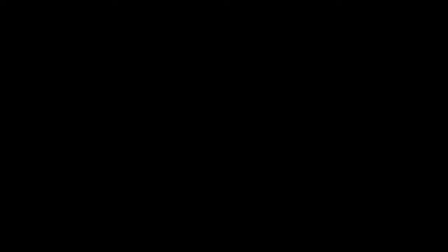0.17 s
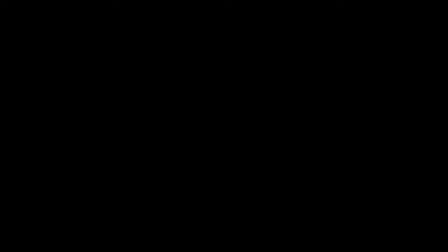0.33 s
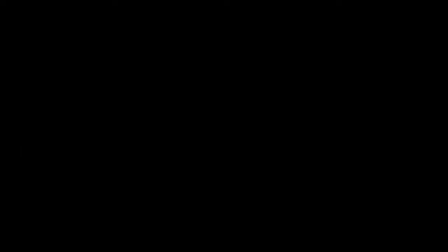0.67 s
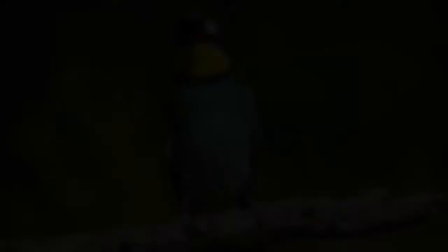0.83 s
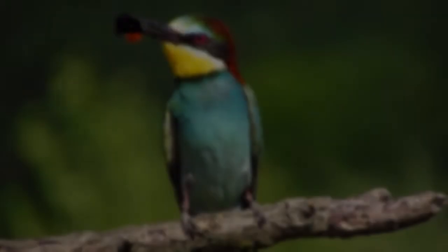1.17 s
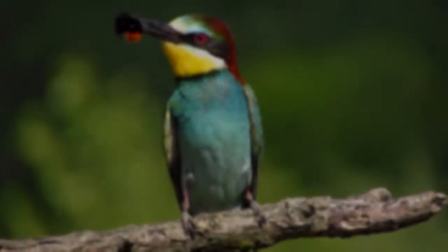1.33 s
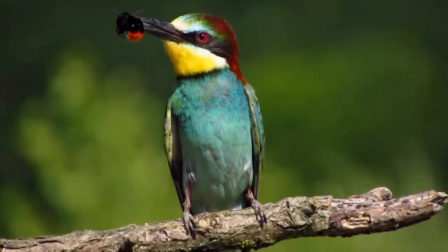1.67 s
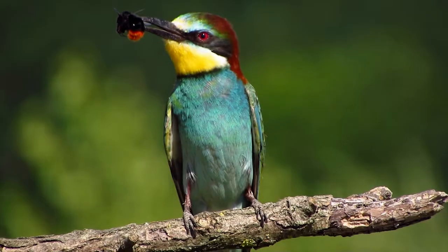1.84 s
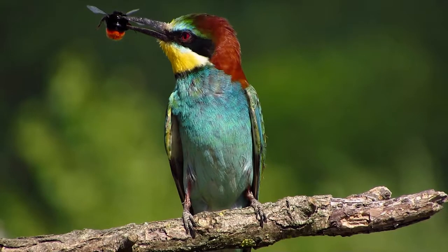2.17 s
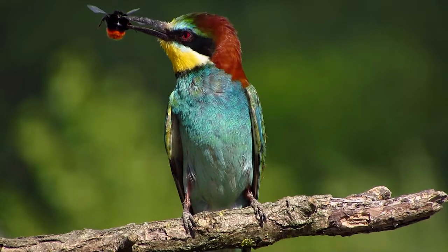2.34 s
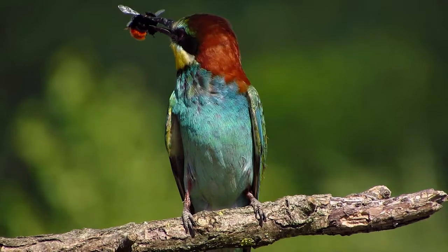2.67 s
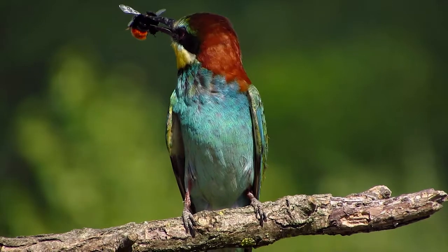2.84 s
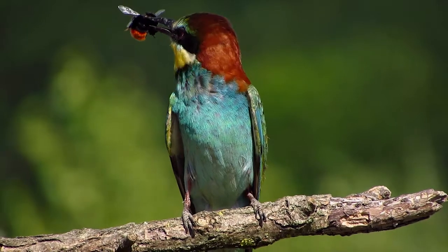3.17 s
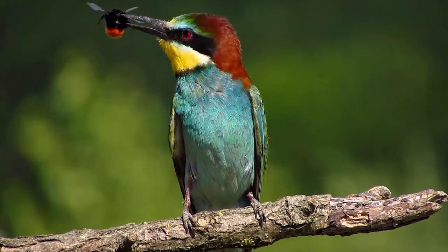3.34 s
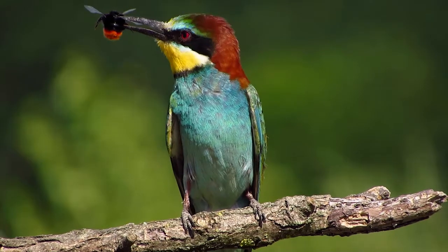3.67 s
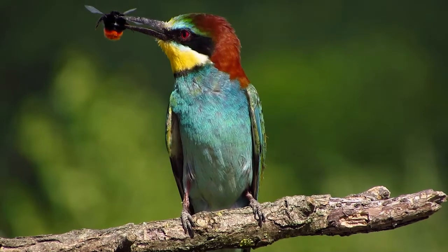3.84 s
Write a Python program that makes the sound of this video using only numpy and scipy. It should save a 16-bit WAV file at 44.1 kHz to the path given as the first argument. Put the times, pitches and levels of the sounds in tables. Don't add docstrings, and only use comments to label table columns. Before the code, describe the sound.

A small bird gives brief rolled whistles in open country, answered faintly by a farther bird

```python
import sys
import numpy as np
from scipy import signal
from scipy.io import wavfile
from scipy.ndimage import uniform_filter1d

SR = 44100
rng = np.random.default_rng(int(sys.argv[2]) if len(sys.argv) > 2 else 0)


def natural_amplitude(level_db):
    exponent = np.asarray(level_db, float) / 20
    return 10 ** exponent


def master(y):
    cut = np.clip(np.atleast_2d(y).T, -1, 1)
    pcm = np.round(cut * 32767)
    wavfile.write(sys.argv[1], SR, pcm.astype(np.int16))


N = 176400


def evened(x):
    return x / np.sqrt(np.mean(abs(x) ** 2) + 1e-20)


def read(points, hz):
    f, value = np.transpose(points)
    return np.interp(np.log(hz + 1), np.log(f + 1), value)


def add(mix, s, sound, pan_db):
    part = mix[:, round(s * SR):][:, :len(sound)]
    sides = natural_amplitude(np.array([[pan_db / 2], [-pan_db / 2]]))
    part += sides * sound[:part.shape[1]]


def fade_db(s):
    start_s, length_s = .11, 2.0
    return 20 * np.log10(np.clip((s - start_s) / length_s, 1e-6, 1))


def noise(magnitude):
    patch_db, swell_db, flicker_db = 1.1, .25, .7
    size = 2 * (len(magnitude) - 1)
    frames = 4 * N // size + 5
    a, b, patches = rng.standard_normal((frames, len(magnitude), 3)).T
    patches = uniform_filter1d(patches, size=20, axis=0)
    patches = evened(uniform_filter1d(patches, size=8, axis=1))
    slow, quick = rng.standard_normal((2, frames))
    swell = evened(uniform_filter1d(slow, size=30))
    field_db = patch_db * patches + swell_db * swell + flicker_db * quick
    spectra = (a + 1j * b) * magnitude[:, None] * natural_amplitude(field_db)
    return signal.istft(spectra, nperseg=size, noverlap=3 * size // 4)[1][:N]


def air():
    # f/Hz, level/dB
    centre_curve = [(20, -10), (200, -19), (800, -11.5), (1500, -18.5), (3300, -21.5), (4300, -24.5),
                    (9000, -28), (14700, -39.5)]
    # f/Hz, level/dB
    side_curve = [(12, -32), (20, -19), (204, -1), (725, -3), (3220, -17), (4020, -19), (7380, -22),
                  (12500, -29.5), (14700, -33)]
    mid_db, side_db, pan_db = -52.5, -49, -0.06
    hz = np.fft.rfftfreq(2048, 1 / SR)
    mid = natural_amplitude(mid_db) * evened(noise(natural_amplitude(read(centre_curve, hz))))
    side = natural_amplitude(side_db) * evened(noise(natural_amplitude(read(side_curve, hz))))
    return natural_amplitude(np.array([[pan_db / 2], [-pan_db / 2]])) * np.array([mid + side, mid - side])


def drone():
    # f/Hz, width/Hz, level/dB
    resonances = [(281.7, 13.4, -9.5), (355.5, 2, -16), (475, 4, -27.5), (584.9, 22, 1), (738.5, 99, -3.5),
                  (808.5, 20.4, -4), (913, 118, -8.5), (989, 40, -8.5), (1150, 66, -14.5),
                  (1231.5, 42, -11.5), (1409, 20, -19.5)]
    level_db, same, lag_rad = -48.5, 0.94, 0.49
    hz = np.fft.rfftfreq(4096, 1 / SR)
    power = sum((natural_amplitude(db) / (1 + (2 * (hz - f) / width) ** 2)) ** 2 for f, width, db in resonances)
    lines = np.sqrt(power)
    left = noise(lines)
    delayed = (signal.hilbert(left) * np.exp(-1j * lag_rad)).real
    right = same * delayed + np.sqrt(1 - same ** 2) * noise(lines)
    return natural_amplitude(level_db) * evened(np.array([left, right]))


def chorus():
    centre_hz, width_hz, level_db = 9310, 220, -76.5
    hz = np.fft.rfftfreq(2048, 1 / SR)
    band = 1 / (1 + (2 * (hz - centre_hz) / width_hz) ** 2)
    return natural_amplitude(level_db) * evened(np.array([noise(band), noise(band)]))


def whistle(level_db, factor, last_db, lead_db):
    # t/s after the start, f/Hz
    arch = [(.006, 1330), (.016, 1560), (.022, 1830), (.028, 1950), (.036, 2115), (.042, 1960),
            (.048, 1800), (.058, 1520)]
    # centre t/s, half length/s, level/dB
    breaths = [(.011, .005, -23), (.018, .0055, -17), (.0278, .0048, -8), (.0362, .0062, 0),
               (.045, .0042, -5), (.05, .0045, -9), (.057, .006, -23)]
    octave_db, octave_fall_db_per_s, octave_floor_db = -7, -1800, -35
    flutter_db = .8
    t = np.arange(0, .07, 1 / SR)
    turn = 2 * np.pi * np.cumsum(factor * np.interp(t, *np.transpose(arch))) / SR
    puffs = 0
    for k, (centre, half, db) in enumerate(breaths):
        tilt_db = last_db * np.sign(round(centre - .033, 2))
        puff_db = db + tilt_db + lead_db * (k < 2)
        sign = (-1) ** (k >= 4)
        swell = np.cos(np.pi / 2 * np.clip((t - centre) / half, -1, 1)) ** 1.55
        puffs = puffs + natural_amplitude(puff_db) * sign * swell
    fall_db = octave_db + octave_fall_db_per_s * np.maximum(t - .014, 0)
    octave = natural_amplitude(np.maximum(fall_db, octave_floor_db))
    flutter = evened(uniform_filter1d(rng.standard_normal(len(t)), size=120))
    puffs = puffs * natural_amplitude(flutter_db * flutter)
    return natural_amplitude(level_db) * puffs * (np.sin(turn) + octave * np.sin(2 * turn))


def near_bird(mix):
    # t/s, level/dB, pitch factor, end against start/dB, lead-in/dB
    calls = [
        (.187, -48, 1.02, 0, -6),
        (.5705, -34.5, 1.0, -1, 0),
        (1.0, -29, 1.0, -.5, 0),
        (3.2565, -28.5, .985, 2, -5),
    ]
    for s, level_db, factor, last_db, lead_db in calls:
        add(mix, s, whistle(level_db - fade_db(s + 0.05), factor, last_db, lead_db), -3.8)


def note(length, level_db, top_hz):
    rise, sag, peak = .05, .11, .35
    u = np.arange(0, length, 1 / SR) / length
    rising = rise * np.maximum(1 - u / peak, 0) ** 2
    sagging = sag * np.maximum((u - peak) / (1 - peak), 0) ** 2
    hz = top_hz * (1 - rising - sagging)
    return natural_amplitude(level_db) * np.sin(np.pi * u) ** .75 * np.sin(2 * np.pi * np.cumsum(hz) / SR)


def far_birds(mix):
    # t/s, length/s, level/dB, top f/Hz, left over right/dB
    calls = [
        (1.8, 0.05, -55.5, 1656, -6),
        (1.875, 0.054, -48.5, 1786, -5),
        (3.467, 0.044, -58, 1675, -19),
        (3.541, 0.056, -46.5, 1780, -4),
        (0.442, 0.016, -67, 3310, 0),
        (0.785, 0.013, -63.5, 3700, -3),
        (1.383, .016, -57, 3770, 2),
    ]
    for s, length, level_db, top_hz, pan_db in calls:
        add(mix, s, note(length, level_db - fade_db(s), top_hz), pan_db)


def ticks(length, level_db):
    rate_hz, centre_hz, width_hz, swell_db = 34, 10500, 2600, 10
    t = np.arange(0, length, 1 / SR)
    band = signal.butter(2, [centre_hz - width_hz / 2, centre_hz + width_hz / 2], "band", fs=SR)
    scratch = evened(signal.lfilter(*band, rng.standard_normal(len(t))))
    uneven = .15 * np.sin(2 * np.pi * (11 * t + rng.random()))
    phase = ((t - length) * rate_hz + uneven) % 1
    pulses = np.exp(-((phase - .5) / .2) ** 2)
    return natural_amplitude(level_db + swell_db * (t / length - 1)) * scratch * pulses


def insect(mix):
    # end t/s, length/s, level/dB
    bursts = [
        (.7, .2, -70),
        (1.82, .2, -62),
        (2.94, .2, -61),
        (4.01, .22, -62),
    ]
    for end, length, level_db in bursts:
        add(mix, end - length, ticks(length, level_db), 0)


def trill(mix):
    # t/s, f/Hz, level/dB, throbs per s
    course = [
        (3.1, 345, -60, 60),
        (3.13, 372, -49, 58),
        (3.22, 372, -50, 54),
        (3.3, 372, -53, 42),
        (3.46, 372, -53, 40),
        (3.62, 366, -55, 38),
        (3.72, 348, -57, 37),
        (3.78, 338, -66, 36),
    ]
    # f/Hz, level/dB
    throat = [(1200, -24), (1550, -10), (1900, -2), (2250, 0), (2600, -2.5), (3000, -9), (3600, -26)]
    glide, jitter = .04, .018
    narrow_start, open_s, sink_per_s = 5.5, .15, .45
    throb_depth, throb_sharp = .8, 1.3
    s, hz, level_db, rate = np.transpose(course)
    t = np.arange(s[0], s[-1], 1 / SR)
    beat = np.cumsum(np.interp(t, s, rate)) / SR % 1
    wobble = evened(uniform_filter1d(rng.standard_normal(len(t)), size=300))
    pitch = np.interp(t, s, hz) * (1 + glide * (2 * beat - 1) + jitter * wobble)
    turn = 2 * np.pi * np.cumsum(pitch) / SR
    narrow = 1 + (narrow_start - 1) * np.exp(-(t - s[0]) / open_s)
    sink = 1 + sink_per_s * np.maximum(t - s[4], 0)
    voice = 0
    for k in range(3, 10):
        harmonic_db = narrow * read(throat, k * pitch * sink)
        voice = voice + natural_amplitude(harmonic_db) * np.sin(k * turn + k * k)
    throbs = 1 - throb_depth + throb_depth * np.sin(np.pi * beat) ** throb_sharp
    add(mix, s[0], natural_amplitude(np.interp(t, s, level_db)) * throbs * voice, -10)


def outdoors(x):
    echo_s, echo_db, wet_db, t60_s = .032, -25, -18.5, .13
    t = np.arange(SR // 2) / SR
    tail = rng.standard_normal((2, len(t))) * natural_amplitude(-60 * t / t60_s) * (t > .006)
    tail = natural_amplitude(wet_db) * tail / np.linalg.norm(tail[0])
    tail[:, round(echo_s * SR)] += natural_amplitude(echo_db)
    return x + signal.fftconvolve(x.mean(0)[None], tail, axes=1)[:, :N]


def scene():
    birds, bugs = np.zeros((2, N)), np.zeros((2, N))
    near_bird(birds)
    far_birds(birds)
    insect(bugs)
    trill(birds)
    return outdoors(birds) + bugs + air() + drone() + chorus()


def roll_off(x):
    return signal.sosfilt(signal.butter(12, 14870, fs=SR, output="sos"), x)


def record(dry):
    # f/Hz, width/Hz
    notches = [(3930, 340), (7865, 280)]
    for hz, width in notches:
        dry = signal.lfilter(*signal.iirnotch(hz, hz / width, SR), dry)
    dry = signal.lfilter(*signal.butter(3, 15, "high", fs=SR), dry)
    dry = signal.sosfilt(signal.butter(6, 13750, fs=SR, output="sos"), dry)
    mix = dry * natural_amplitude(fade_db(np.arange(N) / SR))
    return roll_off(mix)


dry = scene()
out = record(dry)
master(out)
```